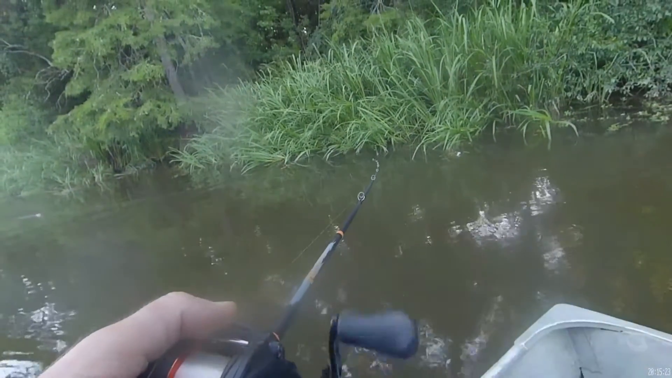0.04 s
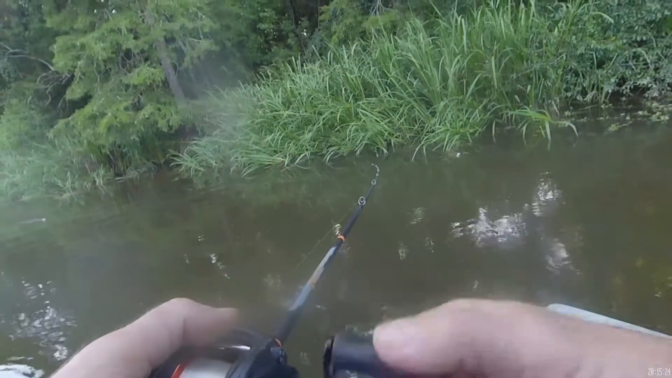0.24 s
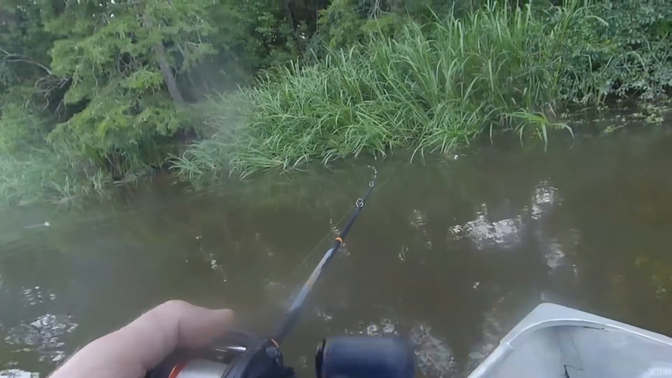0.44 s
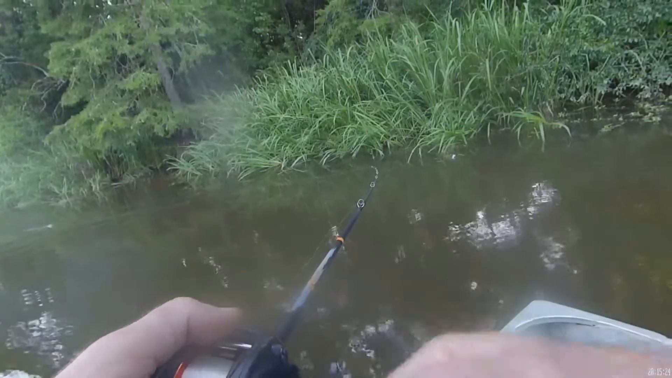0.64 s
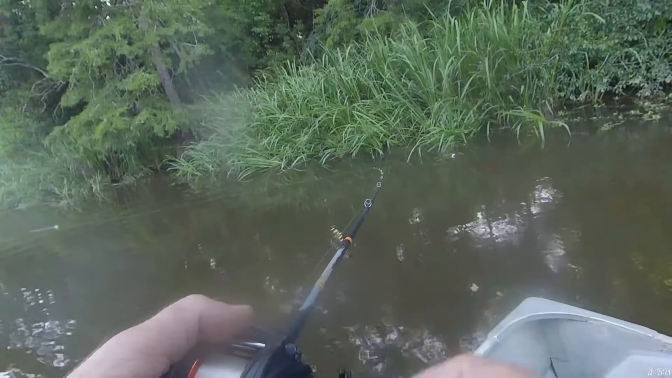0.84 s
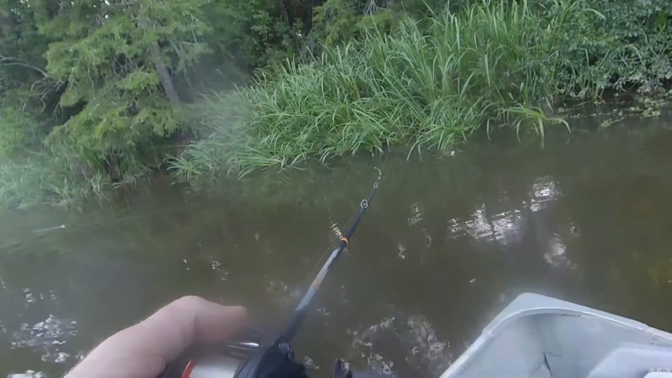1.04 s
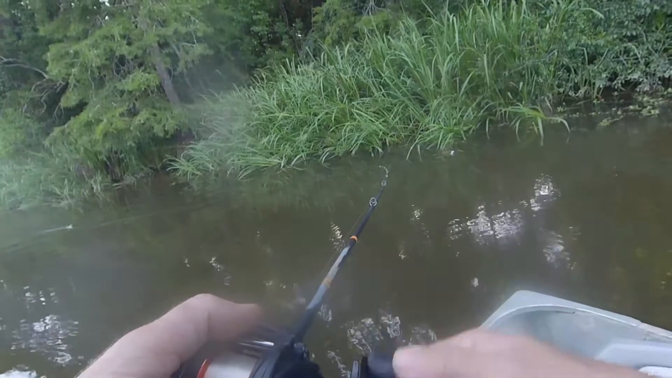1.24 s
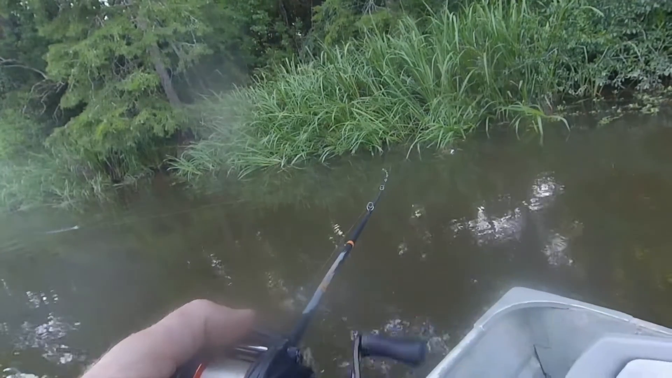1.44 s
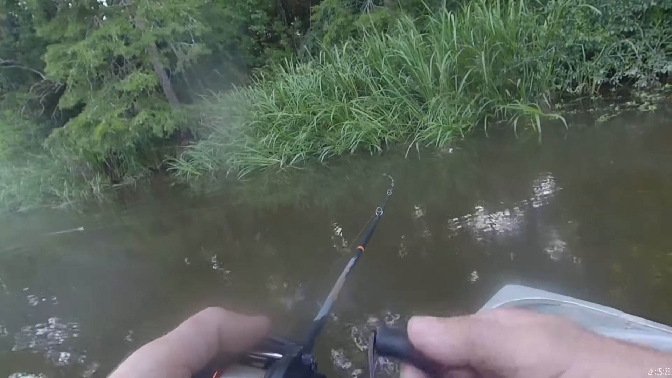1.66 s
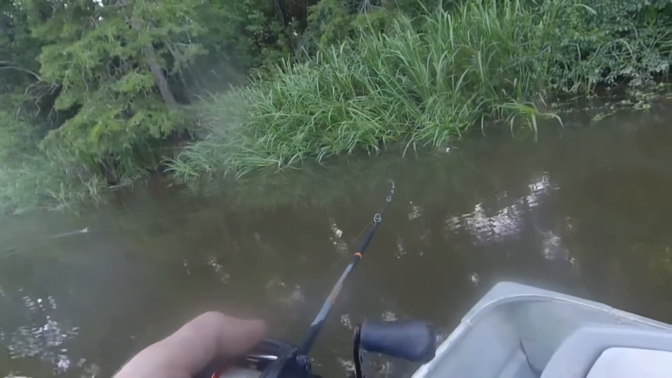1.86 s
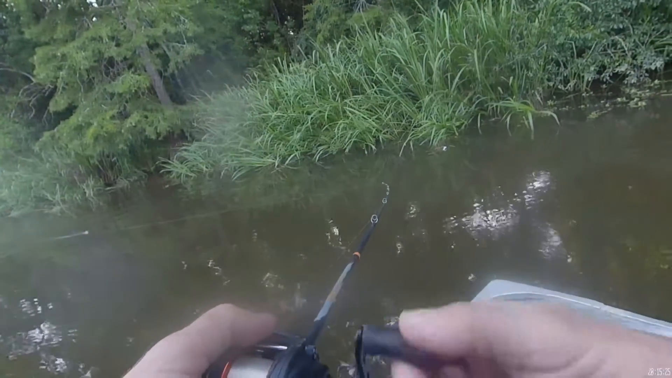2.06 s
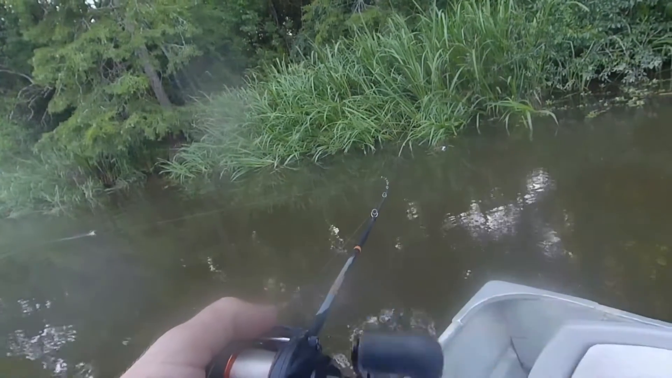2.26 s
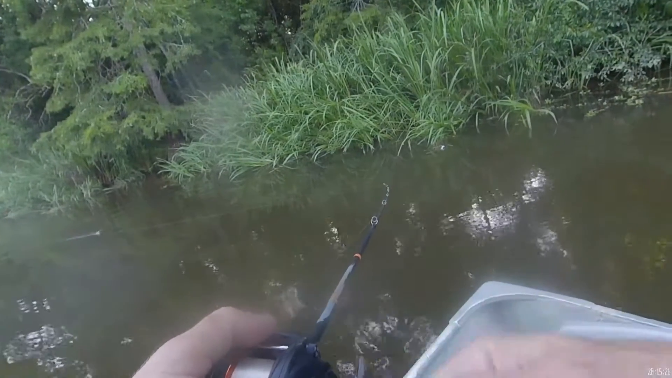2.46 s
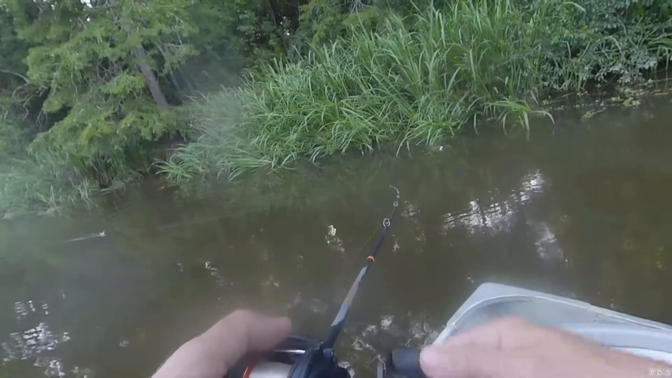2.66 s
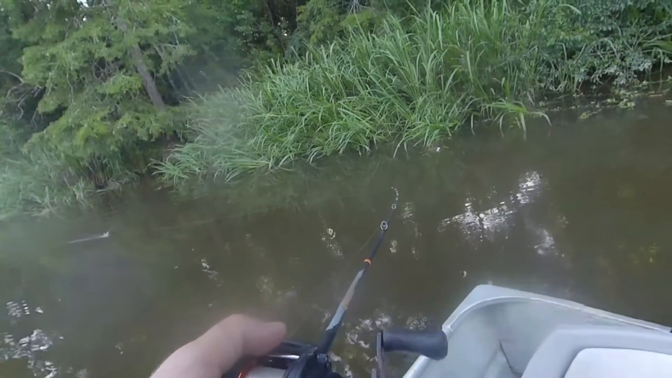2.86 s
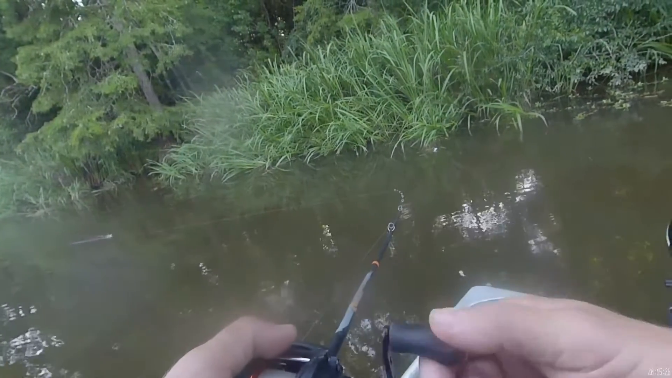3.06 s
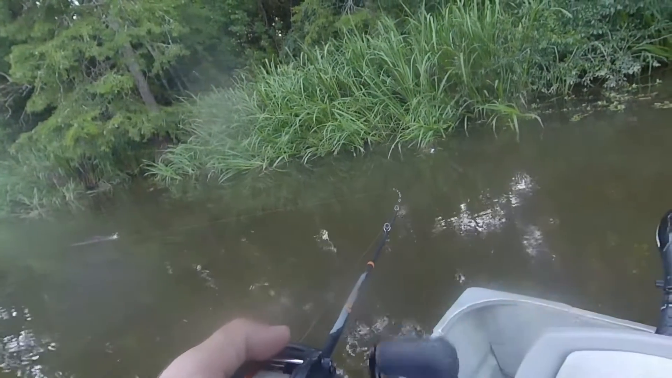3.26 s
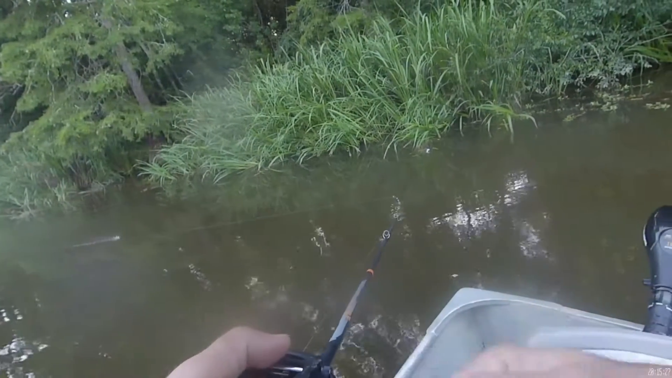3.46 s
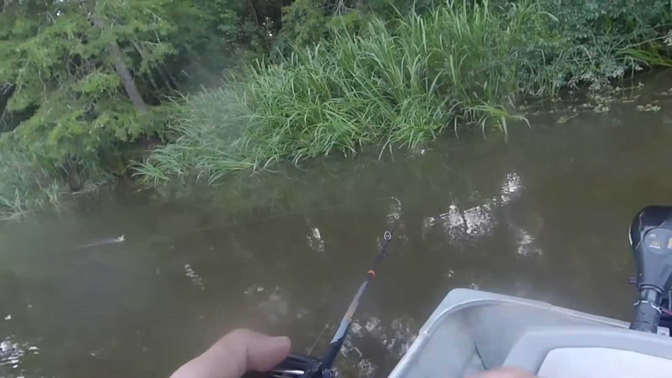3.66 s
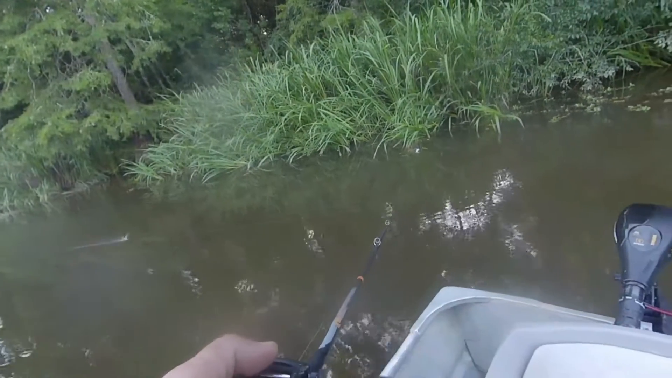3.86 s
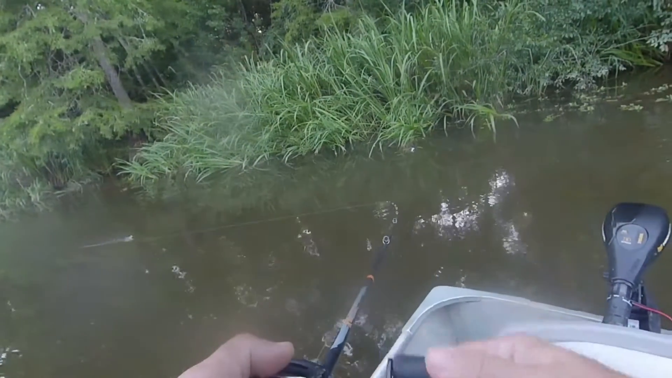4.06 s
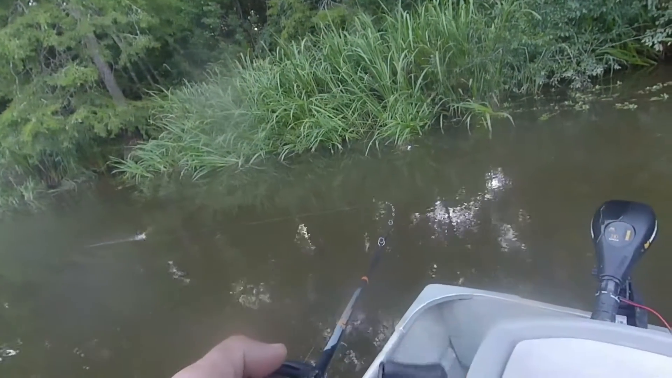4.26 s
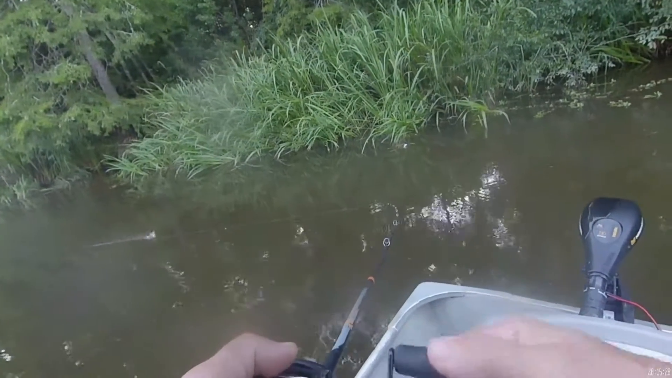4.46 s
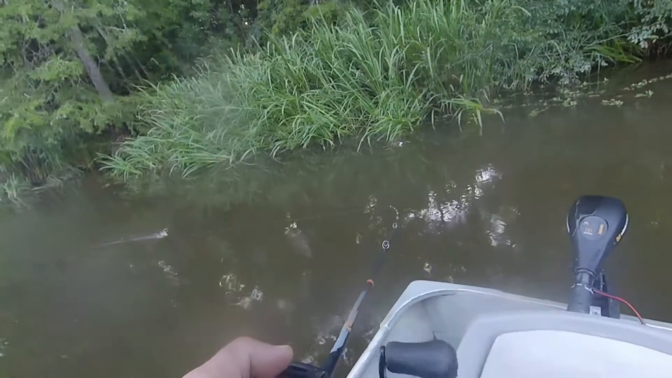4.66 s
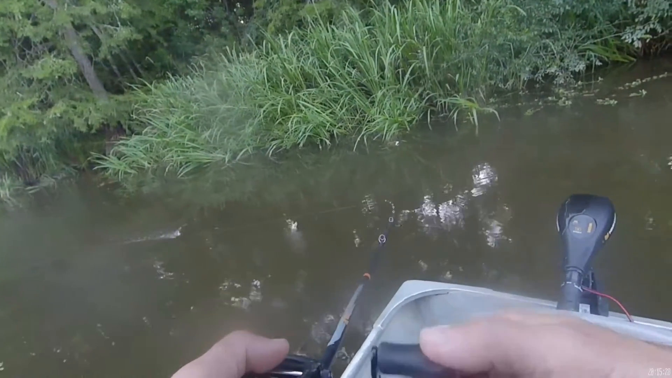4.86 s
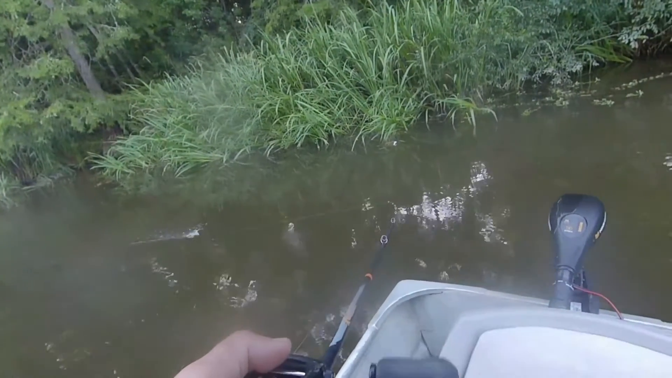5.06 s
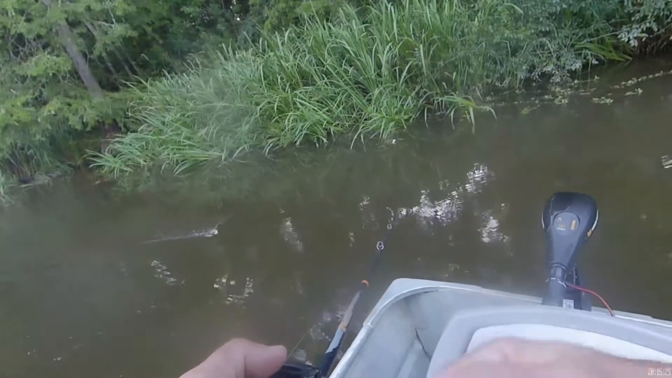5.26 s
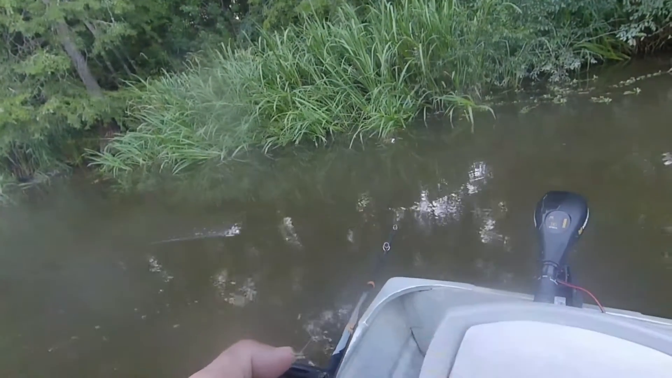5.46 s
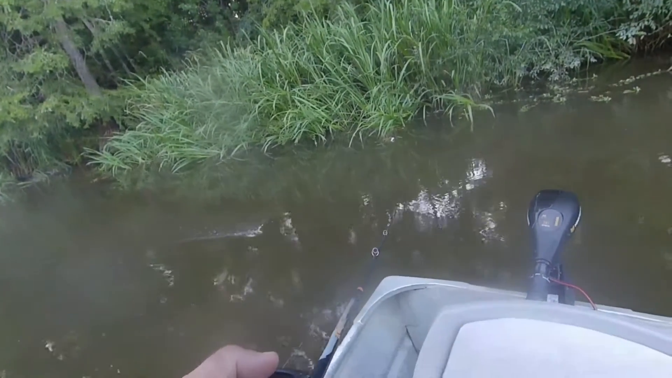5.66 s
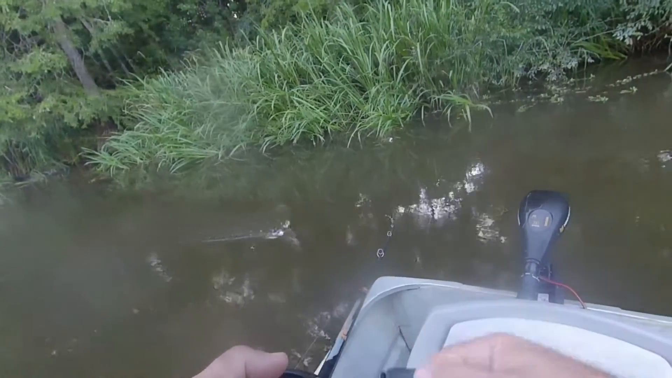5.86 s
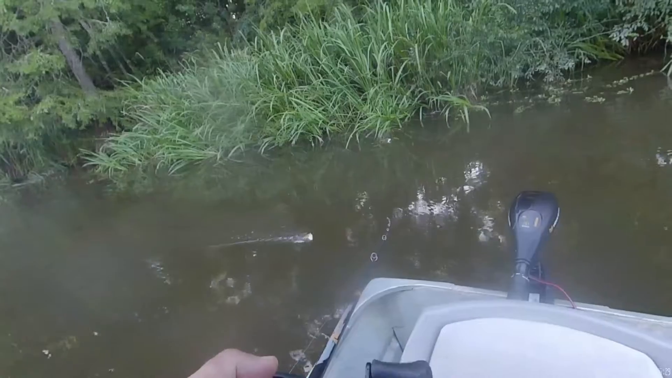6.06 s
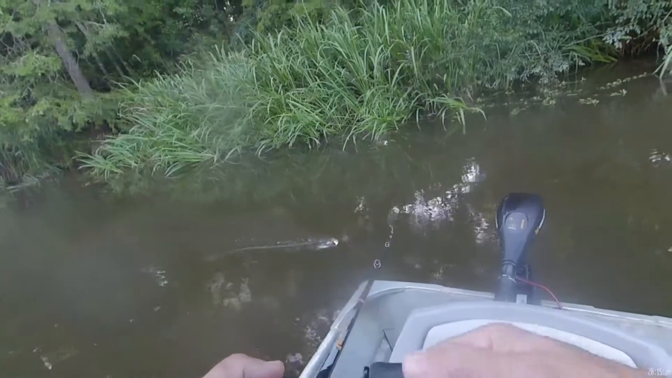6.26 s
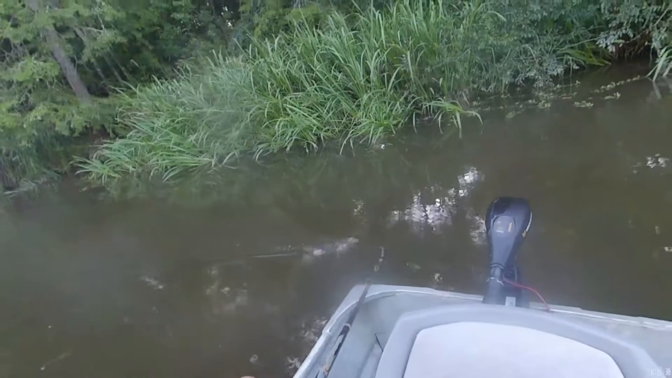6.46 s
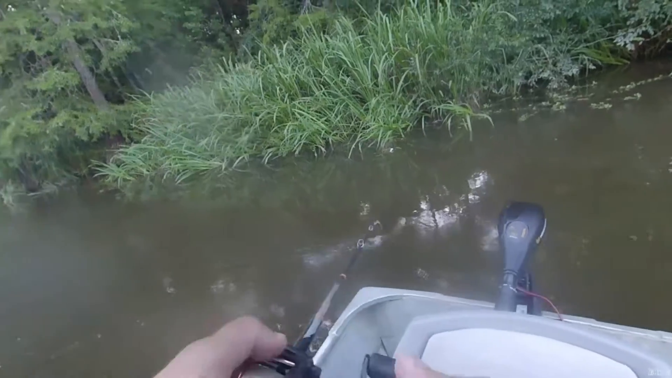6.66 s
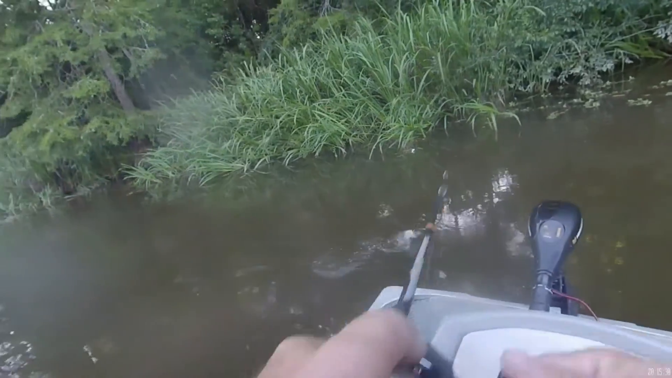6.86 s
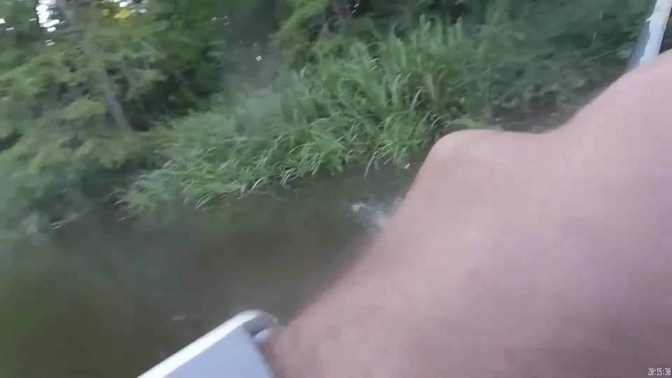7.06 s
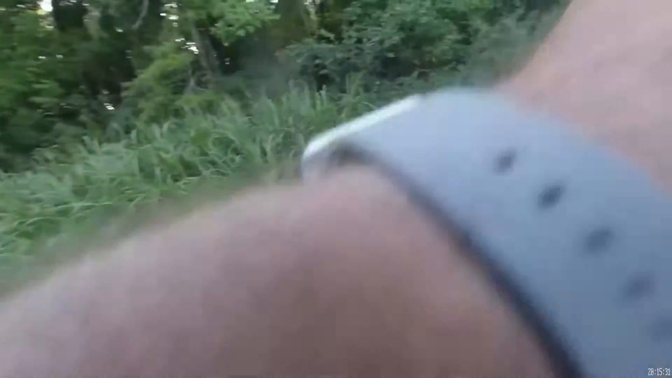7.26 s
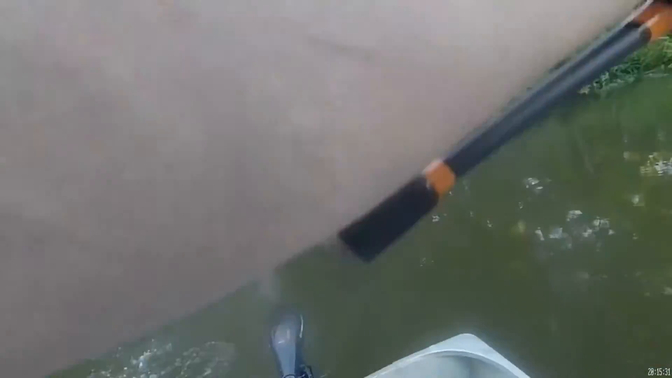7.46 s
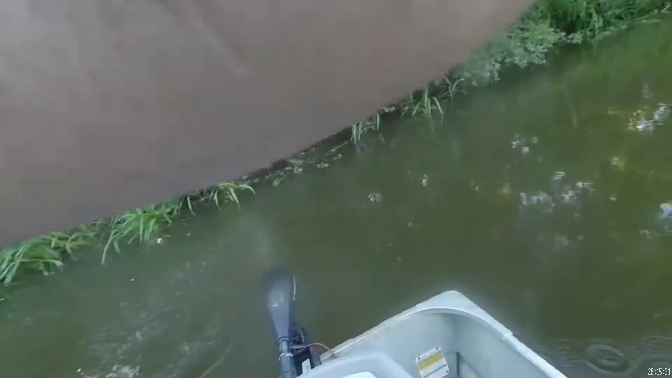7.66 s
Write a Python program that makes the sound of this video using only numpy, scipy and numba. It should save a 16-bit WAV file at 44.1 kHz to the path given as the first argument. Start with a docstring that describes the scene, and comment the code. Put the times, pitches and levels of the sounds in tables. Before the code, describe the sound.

Insects buzz steadily by a lake while a reeled lure slaps the water closer and closer, then lifts out dripping and clinking.

```python
"""On a lake shore, by the reeds. Behind everything lie a low rumble, leaf hiss and a soft passing hum.
A cicada clicks its tymbals, and a katydid in the reeds scrapes its wings in two buzzing phrases.
An angler reels in a surface lure: its spinning blade slaps the water, nearer and nearer, and gulps air.
Then it is lifted out, dripping, and its metal blade clinks as the rod swings past the microphone."""
import sys
import numpy as np
from scipy import signal
from scipy.fft import rfft, irfft, next_fast_len
from scipy.io import wavfile
from scipy.ndimage import uniform_filter1d
from numba import njit

SR = 44100
rng = np.random.default_rng(int(sys.argv[2]) if len(sys.argv) > 2 else 0)


def master(y):
    """Save y as 16-bit WAV."""
    cut = np.clip(np.atleast_2d(y).T, -1, 1)
    pcm = np.round(cut * 32767)  # scale
    wavfile.write(sys.argv[1], SR, pcm.astype(np.int16))


N = 339998
T = np.arange(N) / SR


def undb(db):
    return np.exp(np.asarray(db) * (np.log(10) / 20))


def unit(x):
    return x / np.sqrt(np.mean(x ** 2))


def curves(table):
    """Columns of a table joined by straight lines in time."""
    times, *columns = np.transpose(table)
    return [np.interp(T, times, column) for column in columns]


@njit
def svf(x, hz, width):
    """State-variable band-pass with a moving centre, gain 1 there."""
    y, band_state, low_state = np.empty(len(x)), 0., 0.
    for i in range(len(x)):
        g, damping = np.tan(np.pi * hz[i] / SR), width / hz[i]
        v = (band_state + g * (x[i] - low_state)) / (1 + g * (g + damping))
        band_state, low_state, y[i] = 2 * v - band_state, low_state + 2 * g * v, damping * v
    return y


def band(x, hz, width):
    """A steady resonance applied twice."""
    centre = np.full(len(x), float(hz))
    return svf(svf(x, centre, float(width)), centre, float(width))


def walk(rate):
    """Random levels held 1 / rate s and slewed twice; spread near 1."""
    step = int(SR / rate)
    held = np.repeat(rng.standard_normal(N // step + 1), step)
    return 1.364 * uniform_filter1d(uniform_filter1d(held, step), step)[:N]


def coloured(points, flicker_db):
    """Noise with a (frequency [Hz], level [dB]) spectrum whose octaves flicker apart."""
    size = next_fast_len(N)
    hz = np.maximum(np.arange(size // 2 + 1) * SR / size, 1)
    point_hz, point_db = np.transpose(points)
    spectrum = rfft(rng.standard_normal(size)) * undb(np.interp(np.log(hz), np.log(point_hz), point_db))
    octave = np.log2(hz / 20)
    bands = (irfft(spectrum * np.maximum(1 - abs(octave - k), 0), size)[:N] for k in range(11))
    return unit(sum(x * undb(flicker_db * walk(6)) for x in bands))


def add(out, s, x):
    """Mixes a short sound in at time s."""
    i = int(s * SR)
    out[i:i + len(x)] += x[:max(N - i, 0)]


def envelope(t, rise, hold, t60):
    """Rises, holds, then falls 60 dB every t60 seconds."""
    return (1 - np.exp(-t / rise)) * 1000. ** (-np.maximum(t - hold, 0) / t60)


def ring(hz, t60, glide=0., rise=0.0002, order=1, hold=0.):
    """A dying sine, `glide` octaves up after half its t60; a higher order starts flat and hooks up."""
    t = np.arange(int((t60 + hold) * SR) + 2) / SR
    octaves = np.minimum(glide * (t / (.5 * t60)) ** order, 5)
    pitch = np.minimum(hz * 2 ** octaves, .45 * SR)
    return np.sin(2 * np.pi * np.cumsum(pitch) / SR) * envelope(t, rise, hold, t60)


def puff(t60, hz, width, hold=0.00044, rise=.0001):
    """A burst of noise heard through a resonance; peak 1."""
    t = np.arange(int((t60 + hold + 4 / width) * SR)) / SR
    x = band(rng.standard_normal(len(t)) * envelope(t, rise, hold, t60), hz, width)
    return x / abs(x).max()


def air():
    """Low rumble and leaf hiss all around the microphone."""
    # spectrum of the shore: (frequency [Hz], relative density [dB])
    spectrum = [(9, -46), (15, 3.5), (74, -1.5), (232, -18.5), (994, -28), (1490, -36), (2400, -29.5),
                (3050, -32.5), (4930, -29), (6790, -34), (9630, -24.5), (13700, -31), (15800, -26.5)]
    return undb(-44.5) * coloured(spectrum, flicker_db=2.3)


def hum(hz=278.8, from_s=2.79, to_s=5.8, swell_at_s=5.1):
    """A soft wavering tone that comes and goes, with one swell."""
    fade = np.clip(2 * np.minimum(T - from_s, to_s - T) + 1, 0, 1)
    db = -66.5 + 11 * np.exp(-((T - swell_at_s) / .19) ** 2) + 2 * walk(8)
    return fade * undb(db) * np.sin(2 * np.pi * np.cumsum(hz + 7 * walk(30)) / SR)


def cicada(lag_s=.000304, weak_db=-.4, body_width_hz=420., throb_hz=38):
    """In the background, two tymbals click in turn, not quite evenly, into a cicada's hollow body."""
    # (time [s], click rate of each tymbal [Hz], timing scatter [periods], body resonance [Hz])
    tymbals = [(0, 159.4, .002, 4620), (1.0, 159.8, .003, 4630), (1.4, 164, .01, 4950),
               (2.0, 166.5, .006, 5170), (2.15, 164.3, .001, 4985), (3.9, 164.2, .001, 4960),
               (4.6, 164.1, .003, 4780), (7.71, 164.3, .006, 4770)]
    # loudness: (time [s], level [dB], side resonances against the body [dB])
    levels = [(0, -62, 3), (1.0, -65, 6.5), (1.45, -62, 2.5), (2.3, -56.5, -1.5), (3.5, -56, -3.5),
              (4.3, -60.5, 4.5), (6.6, -64.5, 1), (6.8, -73.5, -6), (7.71, -65.5, 5)]
    # side resonances: (frequency [Hz], width [Hz], level [dB])
    side_modes = [(4180, 650, -3), (9520, 900, 2), (13660, 2700, 5)]
    hz, scatter, body_hz = curves(tymbals)
    level_db, sides_db = curves(levels)
    cycles = np.cumsum(hz * (1 + 0.001097 * walk(70))) / SR
    count = np.arange(1, int(2 * cycles[-1]))
    second_tymbal = count % 2
    times = np.interp(count / 2, cycles, T)
    jitter, loud = rng.standard_normal((len(count), 2)).T
    times = times + lag_s * second_tymbal + jitter * np.interp(times, T, scatter / hz)
    # windowed sincs let the clicks fall between samples
    place = np.clip(times * SR, 8, N - 9)
    taps = place.astype(int) + np.arange(-7, 9)[:, None]
    pulses = np.sinc(taps - place) * np.cos(np.pi * (taps - place) / 16)
    clicks = np.zeros(N)
    np.add.at(clicks, taps, pulses * undb(.5 * loud + weak_db * second_tymbal))
    body = unit(svf(svf(clicks, body_hz, body_width_hz), body_hz, body_width_hz))
    sides = sum(undb(db) * unit(band(clicks + 0.14 * rng.standard_normal(N), centre, width))
                for centre, width, db in side_modes)
    throb = 1 + .38 * np.cos(2 * np.pi * np.cumsum(throb_hz + 4 * walk(4.4)) / SR)
    return undb(level_db) * (throb * undb(2 * walk(6)) * body + undb(sides_db) * sides)


def wing_strokes(slowing_hz_per_s=.56, sag_db=3, sag_s=0.72):
    """The katydid's stroke count and gain.
    The first phrase stops short; the second fades away as an arm covers the microphone."""
    # song phrases: (start [s], fade begins [s], opening stroke rate [Hz])
    phrases = [(0, 2.79, 47.47), (3.9888, 7.15, 47.677)]
    # loudness of each: (full level [dB], starts softer by [dB], swell [s], fade at the microphone [dB/s])
    dynamics = [(-39.5, 4.5, 0.57, 1500), (-40, 15, 0.19, 54.5)]
    stroke, gain = np.zeros(N), np.zeros(N)
    for (start, end, hz), (db, soft_db, swell, fade) in zip(phrases, dynamics):
        t = T - start
        stroke = np.where(t >= 0, hz * t - slowing_hz_per_s * t ** 2 / 2, stroke)
        drop_db = sag_db * np.clip(1 - (end - T) / sag_s, 0, 1) + fade * np.maximum(T - end, 0)
        gain += (t >= 0) * undb(db - soft_db * np.exp(-(t / swell) ** 2) - drop_db)
    return stroke, gain


def katydid(alike=0.44, scatter_db=-11):
    """In the reeds, one file of teeth scrapes past each stroke; higher wing modes tend to sound later."""
    # wing modes: (frequency [Hz], width [Hz], level [dB], loudest moment [strokes])
    wing_modes = [(8320, 1400, -10, -0.16), (9600, 490, -8.5, -0.081), (11435, 680, -1.5, -0.098),
                  (12270, 350, -1.5, -0.083), (12870, 1420, -6, 0.052), (13000, 320, -4, -0.035),
                  (13940, 1800, -1, 0.14), (15560, 780, -0.5, 0.25)]
    # lone strokes: (time [s], peak [dB])
    lone_strokes = [(0.035, -26), (3.71, -28), (3.7811, -25.5), (3.8504, -27.5), (3.917, -26)]
    stroke, gain = wing_strokes()
    file = rng.standard_normal(940)
    teeth = alike * file[(stroke % 1 * len(file)).astype(int)] + (1 - alike) * rng.standard_normal(N)
    teeth = unit(teeth) * undb(0.74 * walk(47) + 1.5 * walk(900))
    wing = np.zeros(N)
    for hz, width, db, late in wing_modes:
        push = np.exp(np.cos(2 * np.pi * (stroke - late)) - 1)
        # the reeds scatter the song and fill the gaps between strokes
        scattered = undb(scatter_db) * rng.standard_normal(N)
        mode = svf(teeth * push + scattered, hz * (1 + 0.0021 * walk(22)), float(width))
        wing += undb(db + 0.6 * walk(3)) * unit(mode)
    song = unit(band(wing, 12650, 13230)) * gain
    for s, db in lone_strokes:
        add(song, s, undb(db) * puff(0.061, 13600, 10000, hold=0.0064))
    return song


def bank_echo(splashes, t60=0.16):
    """The bank returns a short blurred echo of the splashes."""
    t = np.arange(SR // 5) / SR
    response = undb(-42) * rng.standard_normal(len(t)) * 1000. ** (-t / t60)
    return signal.fftconvolve(splashes, response)[:N]


def slap(db, low_hz, high_hz):
    """A dry crack of the surface, pockets that ring while the blade is under, and fine spatter."""
    out = np.zeros(SR // 10)
    under_s = 0.005 * 2 ** (1.4 * rng.random() - .5)
    add(out, 0, undb(-9.5) * puff(0.011, 5500, 9000, hold=0.003, rise=0.0002))
    add(out, 0, undb(-14.5) * puff(0.023, low_hz, 560, hold=0.0052))
    add(out, 0, undb(-12) * ring(high_hz, 0.012, rise=0.0005, hold=under_s))
    add(out, 0, undb(-9.5) * puff(0.016, high_hz, 450, hold=under_s))
    for ratio, (late, pitch, loud) in zip((0.824, 1.241), rng.random((2, 3))):  # neighbouring pockets
        hz = high_hz * ratio * 2 ** (.2 * pitch - .1)
        add(out, 0.003 * late, undb(-11 - 14.7 * loud) * ring(hz, 0.014, rise=0.001, hold=under_s))
    for late, pitch, loud in rng.random((9, 3)):  # spatter
        hz = high_hz * 2 ** (1.7 * pitch - .2)
        add(out, .03 * late ** 2, undb(-11 - 8 * loud - 9 * late) * ring(hz, 0.01))
    return undb(db) * out


def spinning_blade(turn_s=.049, spins_until_s=6.15, nearing_db_per_s=2.1):
    """The blade nears the microphone: clear slaps, and fainter ones on every turn between them."""
    # clear slaps: (time [s], level [dB], lower ring [Hz], upper ring [Hz])
    slaps = [(0.5775, -33.5, 2420, 3570), (0.874, -34.5, 2320, 4146), (1.0599, -34, 1590, 2810),
             (1.3685, -36, 1580, 2740), (1.417, -35.5, 1240, 3900), (1.464, -36, 1530, 2760),
             (1.99, -36, 1274, 2750), (2.2723, -38.5, 2246, 2574), (2.324, -39, 2200, 3440),
             (2.371, -37, 2680, 4120), (2.414, -32, 2660, 4240), (2.525, -36, 2420, 3950),
             (2.734, -31, 1160, 4120), (2.775, -34.5, 1970, 3630), (2.9246, -34.5, 1220, 3510),
             (3.03, -40, 2300, 3900), (3.14, -42.5, 2330, 3880), (3.2397, -33.5, 2550, 3956),
             (3.328, -31.5, 1750, 4314), (3.5352, -35.5, 1060, 4000), (3.7446, -25.5, 2420, 4350),
             (3.8404, -34, 1800, 4280), (4.1584, -30.5, 1460, 3110), (4.2053, -32, 1460, 3616),
             (4.251, -27.5, 1795, 3130), (4.294, -28.5, 1530, 7600), (4.338, -27, 1480, 3230),
             (4.4887, -30.5, 1030, 3930), (4.5874, -31, 2460, 3380), (4.63, -26.5, 1492, 2810),
             (4.774, -30, 1740, 3930), (4.819, -28.5, 1502, 3150), (4.8711, -31, 2570, 3230),
             (4.981, -30, 2580, 3110), (5.025, -26.5, 1600, 4270), (5.068, -28.5, 1640, 5240),
             (5.113, -21.5, 1720, 3097), (5.156, -32, 1134, 5450), (5.199, -33, 1844, 2900),
             (5.243, -32, 2506, 3320), (5.295, -29, 1050, 4051), (5.451, -32, 2410, 3520),
             (5.4943, -24, 1120, 2950), (5.535, -31, 2900, 5610), (5.5799, -21, 2520, 3510),
             (5.619, -24.5, 1990, 3510), (5.67, -30.5, 2400, 3520), (5.717, -27.5, 2480, 2687),
             (5.78, -22, 2530, 3840), (5.835, -27, 2560, 3180), (5.8934, -28.5, 1910, 3220),
             (5.939, -28, 1930, 4040), (5.9835, -24, 1910, 3570), (6.027, -17, 2120, 4870),
             (6.0702, -23.5, 2500, 3970), (6.114, -25, 1870, 4620), (6.193, -18, 1910, 4800),
             (6.338, -16.5, 2060, 4210), (6.385, -23.5, 1960, 4930), (6.4558, -30.5, 2420, 4690)]
    out = np.zeros(N)
    for s, db, low_hz, high_hz in slaps:
        add(out, s, slap(db, low_hz, high_hz))
    edges = [0] + [s for s, *_ in slaps if s < spins_until_s]
    for start, end in zip(edges, edges[1:]):
        turns = max(round((end - start) / turn_s), 1)
        for s in np.linspace(start, end, turns + 1)[1:-1]:
            loud, low, high = rng.standard_normal(3)
            db = -47 + nearing_db_per_s * s + 2 * loud
            add(out, s, slap(db, 2200 * 2 ** (0.39 * low), 3800 * 2 ** (0.166 * high)))
    return out


def gulps(wake_span_s=(4.1, 7.45)):
    """Air pockets behind the lure glide up as they close; smaller ones gurgle in its wake."""
    # closing pockets: (time [s], level [dB], starting pitch [Hz], glide [octaves])
    pockets = [(1.999, -48.5, 462, 0.32), (4.75, -51, 493, 0.74), (5.296, -46, 481, .7),
               (5.4, -47.5, 491.3, 0.75), (5.675, -48.5, 483, 0.59), (5.774, -45, 511, 0.44),
               (6.468, -36.5, 345, 1.02), (6.495, -41, 623, 0.57), (6.558, -44.5, 253.4, 3.4),
               (6.765, -44, 320, 1.45), (6.812, -50, 233, 1.5), (6.868, -38.5, 765, 0.2),
               (6.883, -45.5, 297, 0.37), (6.93, -41.5, 435, 0.7), (7.204, -36, 816, 0.53)]
    out = np.zeros(N)
    for s, db, hz, glide in pockets:
        pocket = ring(hz, 40 / hz, glide, rise=0.005, order=1.5, hold=6 / hz)
        # the closing surface shivers
        shiver_db = 60 * uniform_filter1d(rng.standard_normal(len(pocket)), size=150)
        add(out, s, undb(db + shiver_db) * pocket)
    for when, pitch, loud in rng.random((110, 3)):
        hz = 380 * 2 ** (1.2 * pitch)
        gurgle = ring(hz, 36 / hz, glide=1.3, rise=0.0098, order=1.5, hold=0.0077)
        add(out, np.interp(when, [0, 1], wake_span_s), undb(-50 + 7.8 * loud ** 2) * gurgle)
    return out


def rush(rise_db_per_s=400, fall_db_per_s=75):
    """Water runs off the lifted lure and cloth rubs, in crackling surges that rise fast and drain away."""
    # spectrum of the rush: (frequency [Hz], relative density [dB])
    spectrum = [(100, -6), (250, -5), (800, 2), (1400, -7.5), (2500, -1.5), (5000, -6.5), (15800, -9.5)]
    # surges: (time [s], level [dB], hold [s])
    surges = [(6.68, -55, 0.03), (6.74, -55, .02), (6.93, -49, 0.04), (7.03, -42.5, 0.1), (7.21, -46, 0.16)]
    noise = coloured(spectrum, flicker_db=3) * undb(5 * np.tanh(walk(90)))
    for when, pitch, loud in rng.random((250, 3)):
        crackle = ring(450 * 2 ** (3.6 * pitch ** 1.3), 0.0119, glide=0.148)
        add(noise, T[-1] - 1.16 * when, undb(1 + 10.7 * loud ** 2) * crackle)
    gain = np.zeros(N)
    for s, db, hold in surges:
        before, after = np.maximum(s - T, 0), np.maximum(T - s - hold, 0)
        gain += undb(db - rise_db_per_s * before - fall_db_per_s * after)
    return noise * gain


def bumps():
    """Lure, hand and rod bump dully."""
    # knocks: (time [s], peak [dB], pitch [Hz])
    knocks = [(6.458, -28, 416), (7.017, -23.5, 1080), (7.017, -24, 1800), (7.047, -27.5, 555),
              (7.076, -29.5, 352), (7.1, -32, 242), (7.108, -33, 700), (7.162, -36, 800), (7.307, -37, 810),
              (7.34, -36, 200), (7.363, -39, 220)]
    out = np.zeros(N)
    for s, db, hz in knocks:
        add(out, s, undb(db) * puff(22 / hz, hz, 0.73 * hz, hold=0.0026))
    return out


def clinks():
    """Close to the microphone the wet metal blade clinks: a bright tick, then its modes ring."""
    # strikes: (time [s], level [dB], share of the low modes [dB], share of the deepest mode [dB])
    strikes = [(6.967, -13, -24, -44.5), (6.996, -14.5, -24, -45.5), (7.0277, -17, -17.5, -40),
               (7.063, -14, -16.5, -38), (7.09, -12, -15, -35), (7.119, -9.5, -17.5, -36.5),
               (7.1992, -12.5, -14, -10.5), (7.232, -21, -30, -29.5), (7.249, -4.5, -19, -45),
               (7.2841, -18.5, -28, -40), (7.331, -23, -14, -30), (7.42, -21, -26.5, -39),
               (7.5757, -24, -22, -40), (7.6264, -14, -20.5, -20.5), (7.6722, -26, -16, -45.5)]
    # blade modes: (frequency [Hz], relative level [dB], ring time [relative])
    blade_modes = [(2030, -14, 0.39), (4770, -3.5, 0.037), (5300, -2, 0.078), (6190, -2, 0.11),
                   (9455, 1, 0.015), (9760, -1.5, 0.1), (11900, -5, 0.072), (13970, 3, 0.042),
                   (14540, -7, 0.108), (15120, 5, 0.063)]
    out = np.zeros(N)
    for s, db, low_db, deep_db in strikes:
        add(out, s, undb(db - 10) * puff(0.02, 10900, 14000))
        for hz, mode_db, ring_time in blade_modes:
            detune, hit, wet = rng.standard_normal(3)
            share_db = deep_db if hz < 3000 else low_db if hz < 7000 else -12
            gain = undb(db + share_db + mode_db + 2 * hit)
            hz = hz * (1 + 0.0066 * detune)
            t60 = 0.429 * ring_time * 2 ** (0.39 * wet)
            add(out, s, gain * ring(hz, t60))
            # the blade chatters on its wire, which roughens each mode
            width = min(0.1 * hz, 0.00002 * hz ** 2)
            add(out, s, gain * undb(-4.5) * puff(2 * t60, hz, width, hold=0.0056))
    return out


def scene():
    """The shore, the insects and the lure at one microphone."""
    splashes = spinning_blade() + gulps()
    surroundings = bank_echo(splashes) + air() + katydid() + cicada()
    lift_out = clinks() + bumps() + rush()
    return (surroundings + hum() + splashes + lift_out)[None]


def record(dry, top_hz=15800):
    """The camera's microphone cuts the top steeply."""
    return signal.sosfilt(signal.ellip(12, .2, 60, top_hz, fs=SR, output="sos"), dry)


dry = scene()
out = record(dry)
master(out)
```